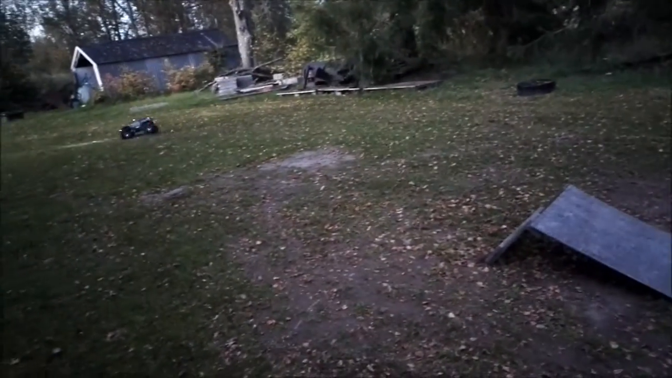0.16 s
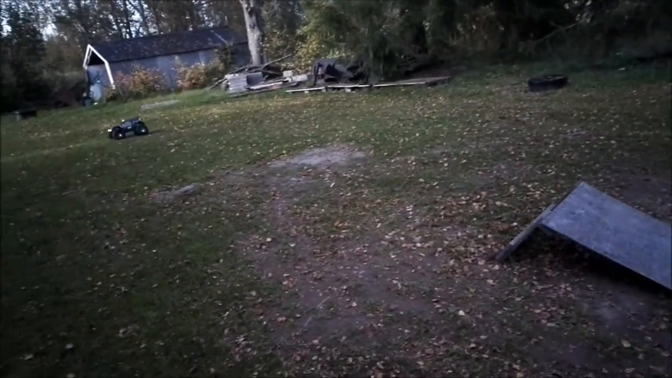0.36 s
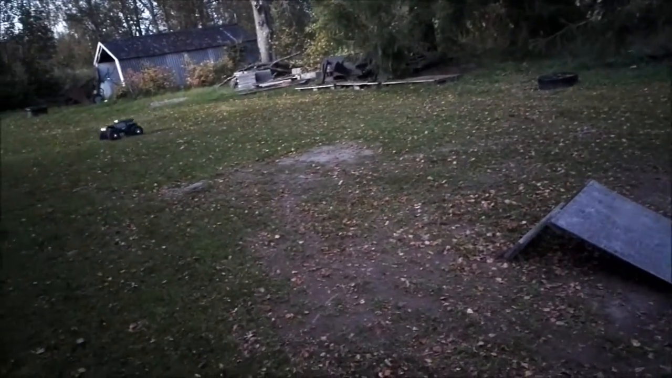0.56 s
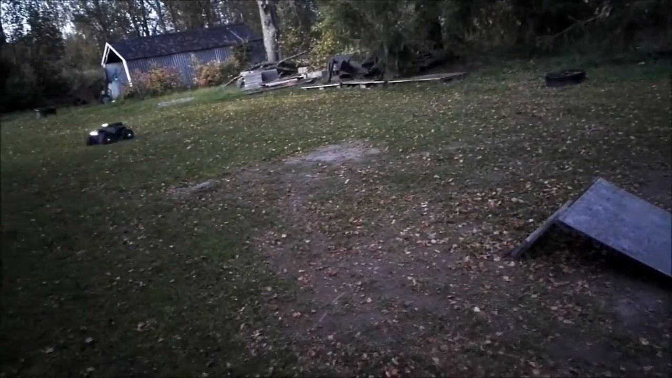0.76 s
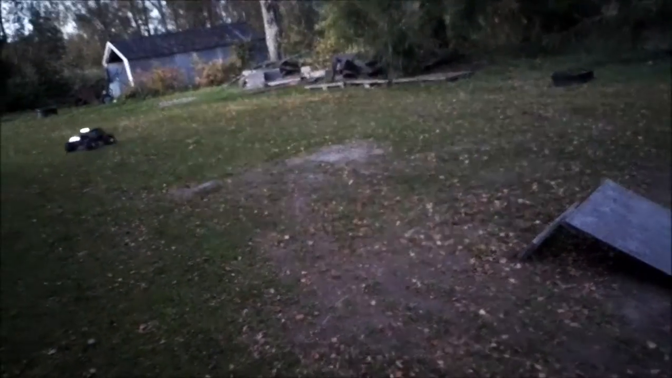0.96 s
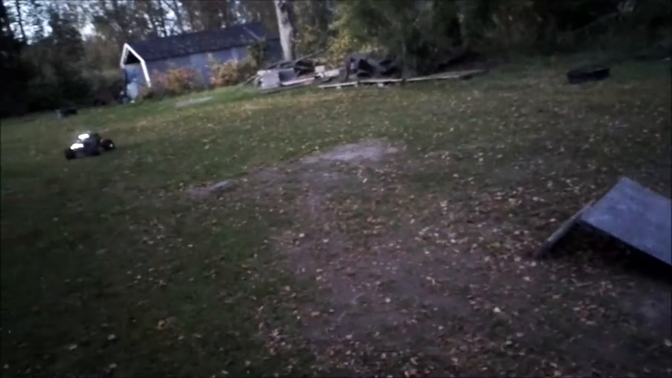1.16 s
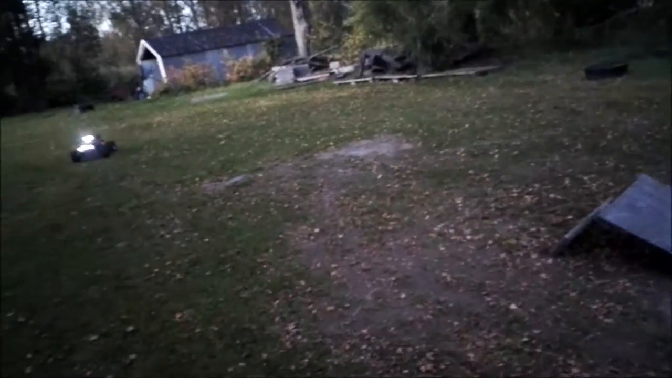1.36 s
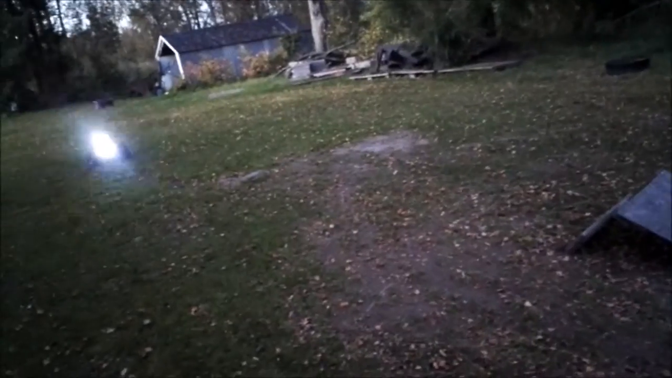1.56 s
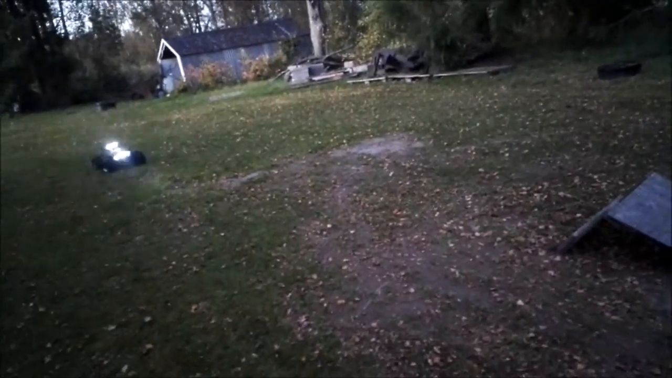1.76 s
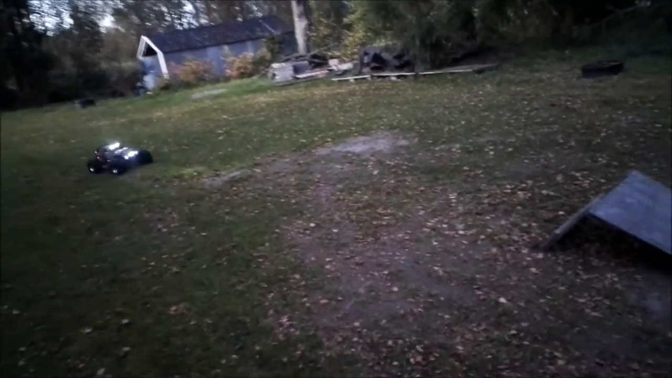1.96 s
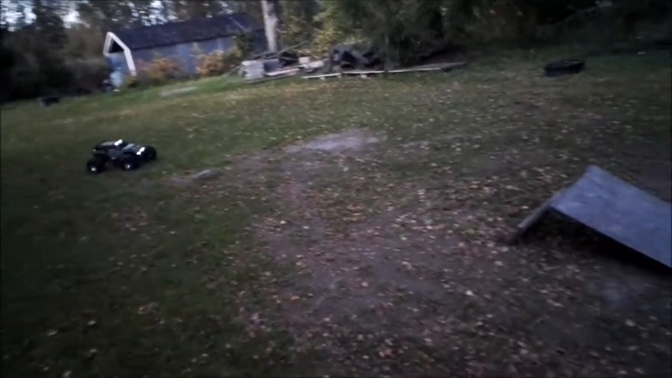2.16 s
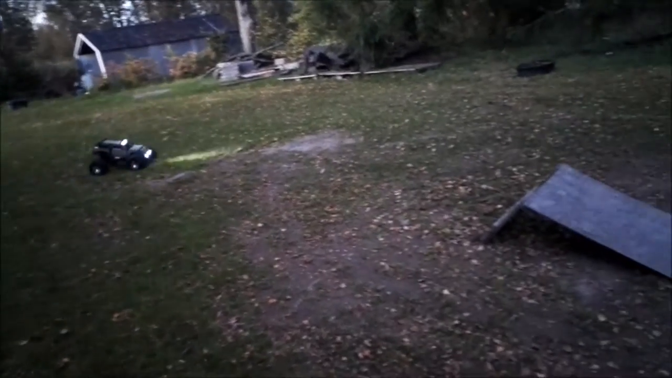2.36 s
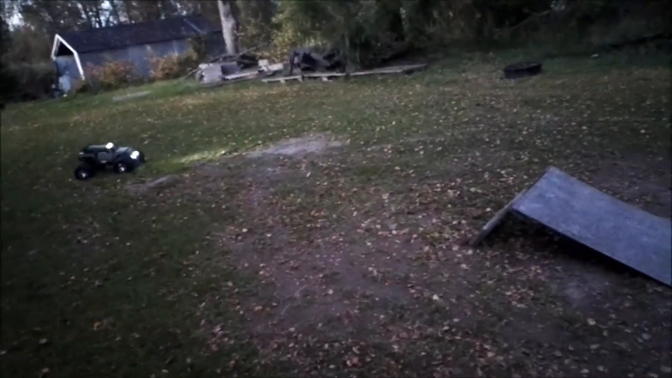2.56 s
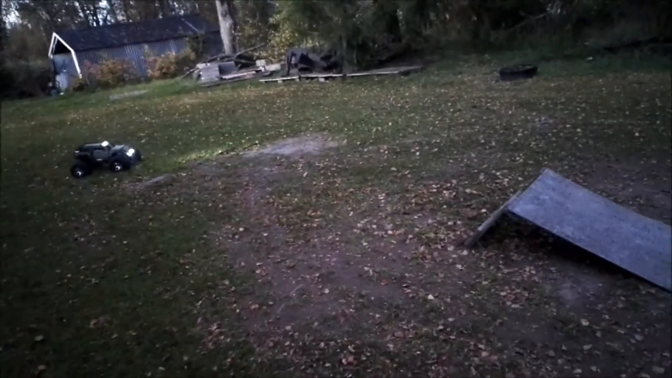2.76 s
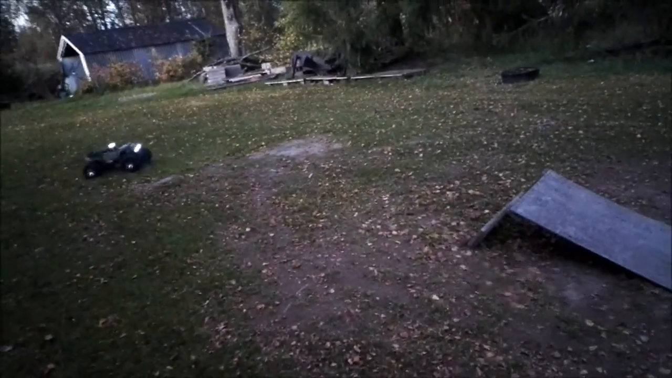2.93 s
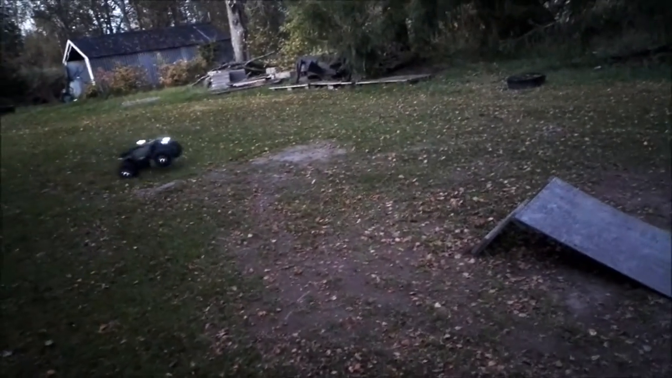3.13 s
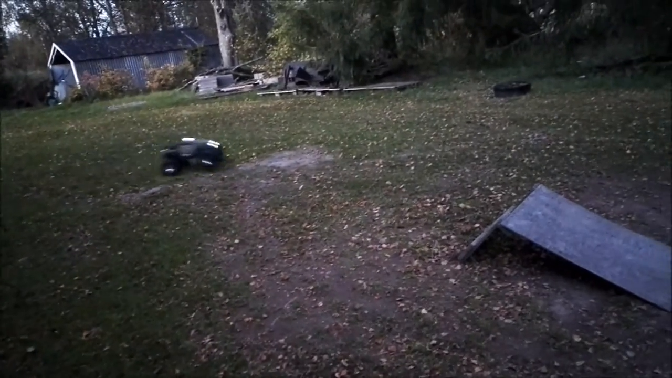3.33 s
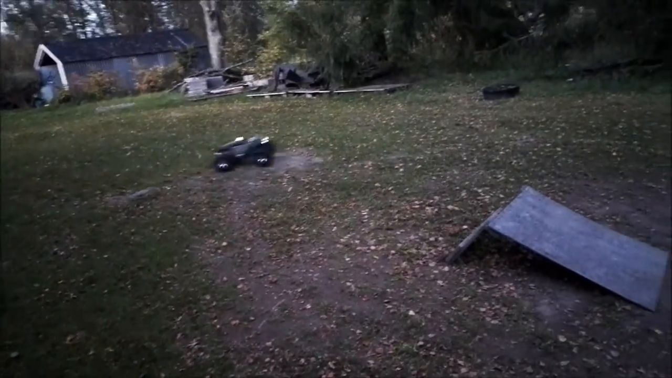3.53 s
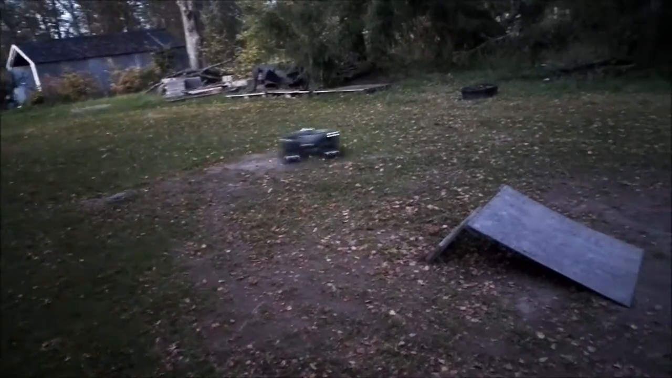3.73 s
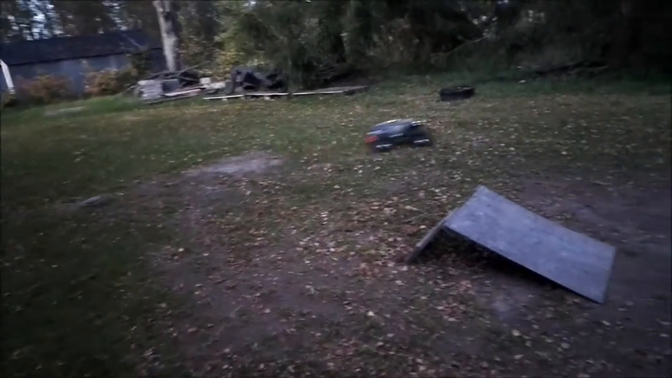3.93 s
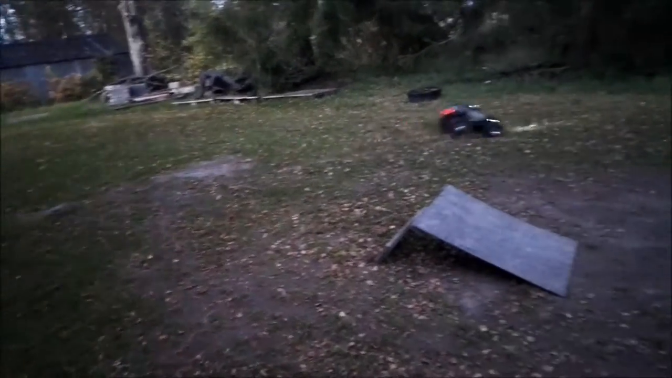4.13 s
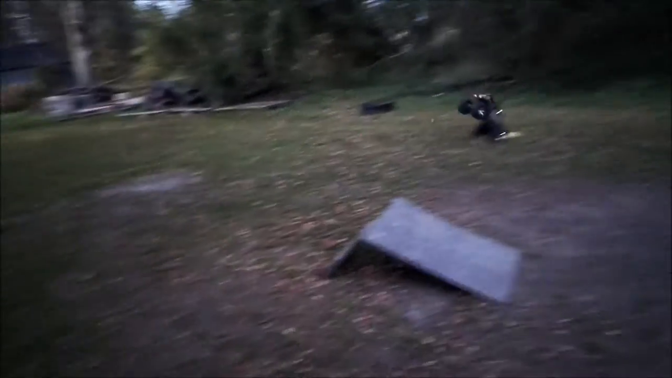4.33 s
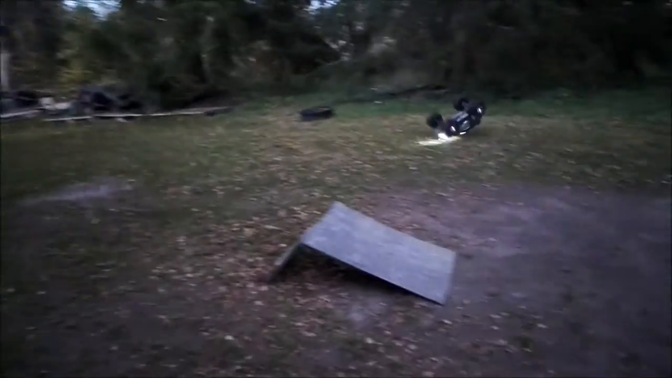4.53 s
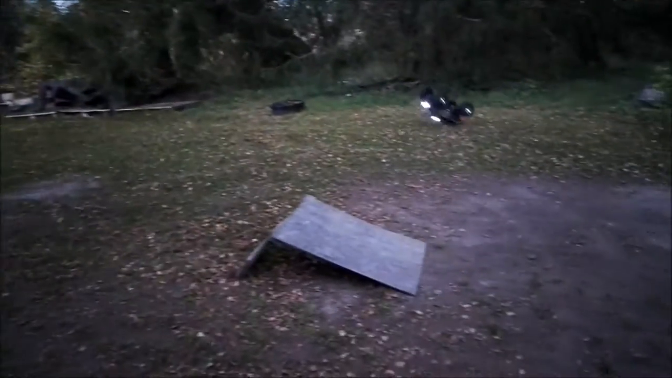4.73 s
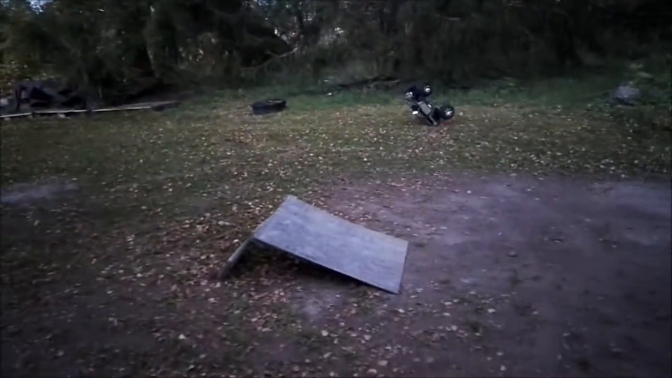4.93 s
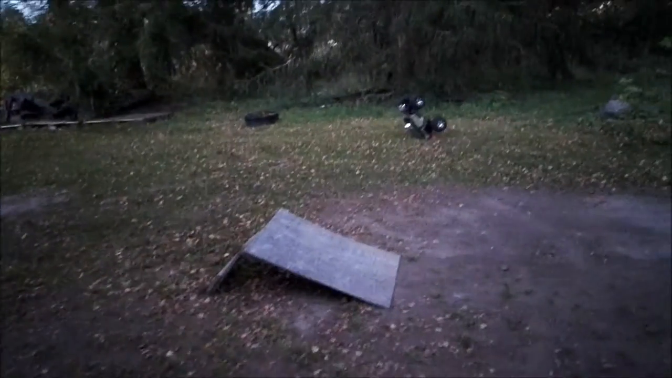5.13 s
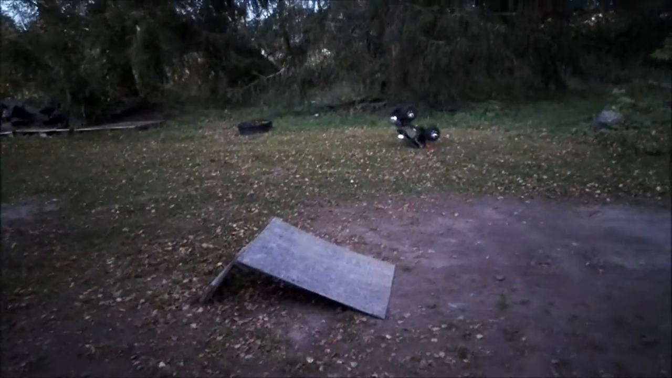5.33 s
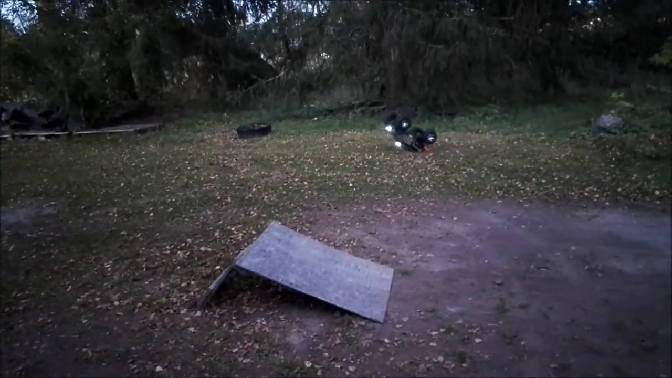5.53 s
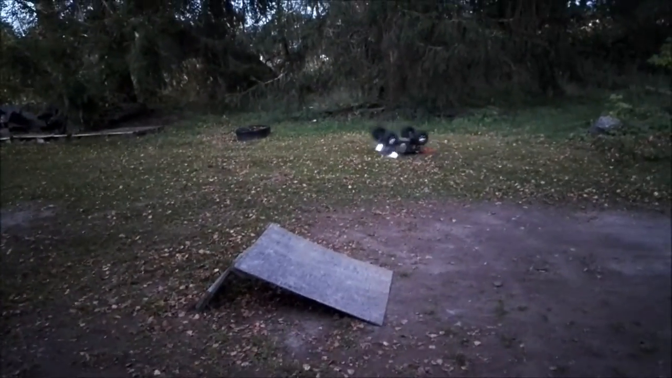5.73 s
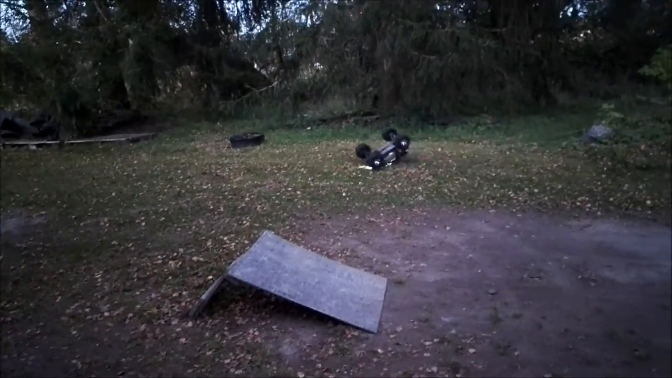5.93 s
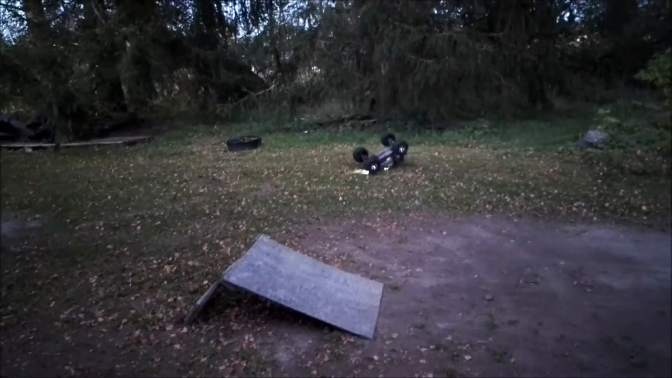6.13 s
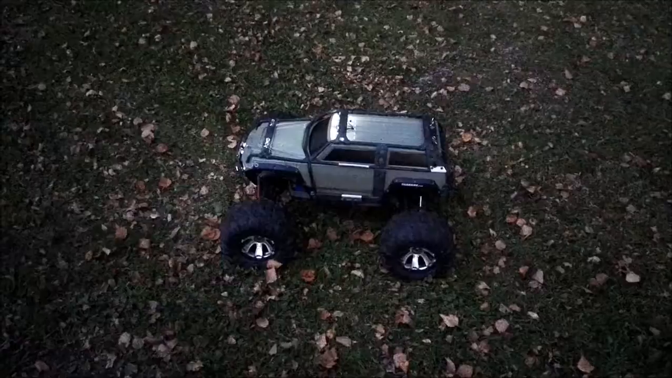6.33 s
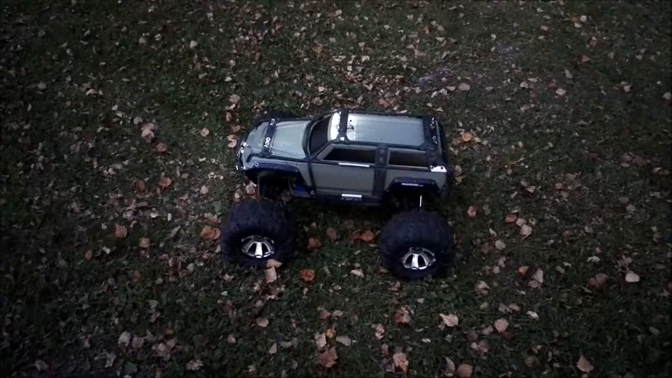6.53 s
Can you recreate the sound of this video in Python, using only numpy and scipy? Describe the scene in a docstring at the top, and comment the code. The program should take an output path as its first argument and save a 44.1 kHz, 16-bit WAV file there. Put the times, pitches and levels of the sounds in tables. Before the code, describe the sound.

Stereo outdoor microphone near the truck, with a short diffuse echo from trees. A toy electric vehicle whirs gently, climbing in pitch, clacks its gears, then races by in two harsh, high whining bursts over grass and leaves. A hard plastic crash follows, then quiet air, a lighter double knock as it topples, and tiny ticks. A brief silence gives way to thin controller whine and a servo chirp.

```python
"""Electric model truck on a leafy lawn

A small truck crawls, brakes, sprints past in two bursts, flips and topples onto its roof.
Its gears are fuzzy tones plus grinding noise; tyres, chassis and leaves are shaped noise.
Sharp noise bursts make the drive-train clacks and the blows, which also ring the hollow body.
A delayed noise wash is the echo from trees round the yard, over a bed of quiet outdoor air.
The sound breaks off, then fades in beside the standing truck, whose speed controller sings."""
import sys
import numpy as np
from scipy import signal
from scipy.fft import rfft, irfft, next_fast_len
from scipy.io import wavfile
from scipy.ndimage import uniform_filter1d, map_coordinates

SR = 44100
rng = np.random.default_rng(int(sys.argv[2]) if len(sys.argv) > 2 else 0)


def persist_wave(psi):
    """Save psi, clipped to +-1, as 16-bit WAV."""
    counts = np.round(np.clip(psi, -1, 1) * 32767).astype(np.int16)
    wavfile.write(sys.argv[1], SR, np.atleast_2d(counts).T)


N = 290613  # length [samples]

# pushes of the throttle or brake: (on [s], off [s], tooth-mesh rate it heads for [Hz], spin-up [s],
# coast [s], gear level before trim [dB], leaf rasp level before trim [dB])
THROTTLE = [(0, .05, 1183, .05, 0.52, -79, -58), (.25, .65, 1074, .02, .2, -54, -62.5),
            (.65, 1.98, 2416, 0.78, .18, -48.5, -55.5), (2.05, 2.21, 1170, 0.073, .42, -49, -54.5),
            (2.877, 3.19, 3444, .07, .19, -36.5, -41), (3.4, 3.925, 4022, .08, 0.2, -36, -43),
            (3.97, 4.12, 2306, 0.054, .36, -54.5, -48.5), (4.27, 4.33, 1923, 0.036, 0.22, -53.5, -57)]
# wheels leave the ground, the motor races and the gears shriek:
# (time [s], peak mesh rate [Hz], shriek level before trim [dB], half length [s])
HOPS = [(3.18, 4035, -47, .03), (3.433, 4120, -27, 0.011), (3.667, 4090, -28.5, 0.026),
        (3.721, 4410, -28.5, .02), (3.796, 4174, -35, .022), (3.863, 4190, -27, .022)]
# colour of the chassis rattle: (frequency [Hz], relative level [dB per Hz])
CHASSIS_COLOUR = [(60, -25.5), (250, -14.5), (430, -8.5), (600, 1), (800, -0.5), (1050, 0), (1350, -13.5),
                  (2000, -4), (4000, -44)]
# how alike left and right are, for the truck and for far sounds: (frequency [Hz], likeness [-1 to 1])
ALIKE = [(60, 0.39), (130, 0.96), (290, 0.98), (640, 0.82), (1400, -0.032), (3100, -0.16), (7000, 0.037)]
FAR_ALIKE = [(60, 0.34), (130, 1), (290, 0.5), (640, -0.058), (1400, -0.32), (3100, -0.0086)]


def amp(db):
    """Turn decibels into a plain multiplier."""
    return 10 ** (np.asarray(db) / 20)


def unit(x):
    """Scale so that the middle of the stereo image has rms 1."""
    middle = np.atleast_2d(x).mean(0)
    return x / np.sqrt(np.mean(middle ** 2) + 1e-20)


def along(points, hz):
    """Read a curve of (frequency [Hz], value) points on a log frequency axis."""
    f, v = np.transpose(points)
    return np.interp(np.log(hz + 1), np.log(f + 1), v)


def curves(rows):
    """One value per sample for each column after the time."""
    s, *columns = np.transpose(rows)
    return [np.interp(np.arange(N) / SR, s, column) for column in columns]


def wobble(rate):
    """A smooth random curve through a given number of random points a second."""
    knots = rng.standard_normal(int(N * rate / SR) + 4)
    return map_coordinates(knots, [np.arange(N) * rate / SR])


def filtered(x, response):
    """Multiply the spectrum of x by a response, which may be complex; padding stops wrap-around."""
    size = x.shape[-1]
    m = next_fast_len(size + SR // 2)
    return irfft(rfft(x, m) * response(np.fft.rfftfreq(m, 1 / SR)), m)[..., :size]


def spread(pair, alike):
    """Mix two unrelated signals into a left and right with the given likeness."""
    def mid_and_side(hz):
        angle = np.arccos(np.clip(along(alike, hz), -1, 1)) / 2
        return np.array([np.cos(angle), np.sin(angle)])

    mid, side = filtered(pair, mid_and_side)
    return np.array([mid + side, mid - side])


def rush(spectrum, alike, grain=1, patchy_db=0):
    """Stereo noise of rms 1: chopped by a grain envelope, patchy in colour, then shaped."""
    z = signal.stft(grain * rng.standard_normal((2, N)), nperseg=512)[2]
    patches = rng.standard_normal(z.shape[1:])
    patches = uniform_filter1d(patches, size=7, axis=0)  # smooth over frequency
    patches = uniform_filter1d(patches, size=8, axis=1)  # smooth over time
    patchy = z * amp(patchy_db * patches / patches.std())
    pair = signal.istft(patchy, nperseg=512)[1][:, :N]
    coloured = filtered(pair, lambda hz: amp(along(spectrum, hz)))
    return unit(spread(coloured, alike))


def bursts(times, dbs, t60s, rise):
    """An envelope that jumps at each contact and dies away, by 60 dB in each t60."""
    power, t = np.zeros(N + SR), np.arange(SR // 4) / SR
    for s, db, t60 in zip(times, dbs, t60s):
        hit = amp(db - 60 * t / t60) * (1 - np.exp(-t / rise))
        power[round(s * SR):][:len(t)] += hit ** 2
    return np.sqrt(power[:N])


def tone(turns, width, clean):
    """A stereo gear tone whose strength and phase stray the faster, the faster it turns."""
    knots = np.abs(turns * width)
    count = int(knots[-1]) + 2

    def stray():
        return np.interp(knots, np.arange(count), rng.standard_normal(count))

    sine, cosine = np.sin(2 * np.pi * turns), np.cos(2 * np.pi * turns)
    left = (clean + stray()) * sine + stray() * cosine
    right = (clean + stray()) * cosine + stray() * sine
    return unit(np.array([left, right]))


def motor():
    """Tooth-mesh rate: it climbs under throttle, sinks when coasting and leaps at each hop."""
    idle_hz = 701  # coasting sinks towards this
    hop_min_s = .022  # the motor's inertia makes no leap shorter than this
    t, hz = np.arange(N) / SR, np.full(N, THROTTLE[0][2], float)
    for on, off, top_hz, spin_up, coast, _, _ in THROTTLE:
        start_hz = hz[np.searchsorted(t, on)]
        driven = top_hz + (start_hz - top_hz) * np.exp(-np.clip(t - on, 0, off - on) / spin_up)
        coasting = np.exp(-np.maximum(t - off, 0) / coast)
        hz = np.where(t < on, hz, idle_hz + (driven - idle_hz) * coasting)
    for s, peak_hz, _, length in HOPS:
        leap = np.exp(-((t - s) / max(length, hop_min_s)) ** 4)
        hz = hz + (peak_hz - hz) * leap
    return hz


def effort(mesh_hz):
    """Gains of gear noise and leaf rasp: attack, hold and release for each push, louder with speed."""
    attack_s, release_db = 0.0107, 28  # the load builds up; it loses this much in one coast time
    gear_db_per_octave, rasp_db_per_octave = 1.5, 2  # faster is louder
    t, gear, rasp = np.arange(N) / SR, 0, 0
    for on, off, top_hz, _, coast, gear_db, rasp_db in THROTTLE:
        attack = np.clip((t - on) / attack_s, 0, 1)
        load = attack * amp(-release_db * np.maximum(t - off, 0) / coast)
        octaves = np.log2(np.interp(np.minimum(t, off), t, mesh_hz) / top_hz)
        gear = np.maximum(gear, load * amp(gear_db + gear_db_per_octave * octaves))
        rasp = np.maximum(rasp, load * amp(rasp_db + rasp_db_per_octave * octaves))
    return gear, rasp


def gears(mesh_hz, gain):
    """Each gear stage gives a fuzzy tone that swells at gearbox resonances; the teeth grind."""
    # gearbox resonances: (frequency [Hz], level [dB])
    housing = [(500, -16.5), (850, -9.5), (1080, -4.5), (1350, -5), (1750, -2.5), (2150, 1), (2550, -1),
               (3000, 1.5), (3600, 2.5), (4200, 1.5), (5200, 3.5), (12000, -28)]
    # gear-train tones: (multiple of mesh rate, relative level [dB], width [share of pitch])
    orders = [(.6, -20.5, .1), (.79, 0, .02), (1, -3, .012), (1, 0, .14), (1.999, -10, .015),
              (2.002, -5.5, .1), (3, -15.5, 0.027)]
    # colour of the tooth noise: (frequency [Hz], relative level [dB per Hz])
    grind_colour = [(700, -23.5), (1300, -12.5), (1900, -12), (2500, 2), (3100, 2), (3700, 3), (4150, -2),
                    (4600, -6.5), (5500, -7), (8000, -16)]
    teeth_per_turn, tight_s = 194.2, 1.08  # teeth met in a wheel turn; one passing of the tight spot [s]
    tight_sharp, tight_sag = 2.7, .045  # narrowness of the tight spot; share of speed lost there
    tight_db, ring_hz, ring_db = 5, 3750, -3.5  # swell at the tight spot, and the gearbox ring there
    t = np.arange(N) / SR

    # at moderate speed the gears bind once in each wheel turn: they slow, grow louder and ring
    wheel = np.cumsum(mesh_hz) / SR / teeth_per_turn
    binding = np.interp(mesh_hz, [1300, 1650, 2300, 3000], [0, 1, 1, 0])
    angle = 2 * np.pi * (wheel - np.interp(tight_s, t, wheel))
    tight = binding * np.exp(tight_sharp * (np.cos(angle) - 1))
    # bumps in the turf jerk the speed
    jerk = np.interp(mesh_hz, [1100, 1800, 3000, 3900], [.008, .03, .025, .01])
    turns = np.cumsum(mesh_hz * (1 + jerk * wobble(60) - tight_sag * tight)) / SR

    whine = 0
    for k, db, width in orders:
        # narrow tones change level with speed; all come and go as the wheels grip and slip
        speed_db = np.interp(mesh_hz, [1100, 1700, 3500], [1, -3, -7]) * (width < .05)
        level_db = along(housing, k * mesh_hz) + db + speed_db + 4 * wobble(22)
        whine = whine + amp(level_db) * tone(k * turns, width, clean=0.22)
    grind = rush(grind_colour, ALIKE, amp(1.6 * wobble(500)), patchy_db=3.5)

    # at high speed the teeth grind harder and the first and second overtones shriek
    strain = np.clip((mesh_hz - 3300) / 600, 0, 1)
    mix = amp(-5) * unit(whine) + (amp(-3.5) + .2 * strain) * grind
    ring = amp(ring_db) * tight * tone(ring_hz * t, width=.035, clean=0.58)
    mix = amp(tight_db * tight) * mix + ring
    shriek = tone(2 * turns, width=.03, clean=.8)
    shriek = shriek + amp(-5) * tone(2 * turns, width=.12, clean=0)
    shriek = shriek + amp(-12) * tone(3 * turns, width=.09, clean=0)
    racing = sum(amp(db) * np.exp(-((t - s) / length) ** 2) for s, _, db, length in HOPS)
    shriek_gain = strain * (amp(-4.5) * gain + amp(-6.5) * racing)
    return amp(-3.0) * gain * mix + shriek_gain * shriek


def squeals(mesh_hz):
    """Gears squeal when a wheel snatches: short wavering tones that glide with the motor speed."""
    # (time [s], pitch [Hz], level before trim [dB], half length [s])
    snatches = [(0.434, 1056, -52.5, 0.081), (0.594, 1080, -48, 0.042), (1.08, 3520, -43, 0.018),
                (1.7, 2133, -52, 0.033), (2.252, 2260, -54, 0.035), (2.34, 1280, -56, 0.03),
                (2.388, 1006, -53, 0.024), (3.052, 3028, -37, 0.027), (3.227, 2396, -44, 0.035),
                (3.714, 2400, -39.5, 0.016), (4.068, 3052, -39, 0.021), (4.07, 3620, -40.5, 0.015),
                (4.072, 1860, -40.5, 0.0091), (4.145, 1009, -47.5, 0.014), (4.148, 1957, -43, 0.011),
                (4.333, 1585, -51.5, 0.021)]
    # the clean part of the tone depends on pitch: (frequency [Hz], clean tone over rough part)
    cleanness = [(1000, 1.6), (2000, 1.8), (3000, .5)]
    out, t = np.zeros((2, N)), np.arange(-SR // 8, SR // 8) / SR
    for s, hz, db, length in snatches:
        start = round(s * SR) - SR // 8
        speed = mesh_hz[start:][:len(t)] / mesh_hz[round(s * SR)]
        voice = tone(np.cumsum(hz * speed) / SR, width=.06, clean=along(cleanness, hz))
        out[:, start:][:, :len(t)] += amp(db) * np.exp(-(t / length) ** 2) * voice
    return out


def rolling(tearing):
    """Tyres drum, the chassis rattles, leaves and grass rasp, most when driven tyres tear at them."""
    # bumpiness of the ride: (time [s], tyre drumming before trim [dB], chassis rattle before trim [dB])
    ground_crawl = [(0.0, -52.5, -56.5), (0.33, -63, -59.5), (1.38, -61.5, -57), (1.97, -51, -55),
                    (2.25, -57, -53), (2.65, -85, -67), (2.74, -77, -66), (2.82, -79, -70)]
    ground_sprint = [(2.85, -54, -57.5), (2.916, -41.5, -47.5), (3.164, -38, -44), (3.344, -58, -56),
                     (3.368, -47.5, -57), (3.482, -41, -40), (3.74, -39, -40.5), (3.792, -45, -43),
                     (4.164, -42.5, -52.5), (4.264, -47.5, -58.5), (4.32, -60.5, -54), (4.56, -60, -75.5)]
    # colours of hollow tyres, and of leaves and grass: (frequency [Hz], relative level [dB per Hz])
    drum_colour = [(30, -32), (55, -22), (90, -5), (150, 4), (260, 3.5), (360, -1.5), (480, -17),
                   (700, -20), (1500, -72.5)]
    rasp_colour = [(700, -17), (1400, -1.5), (2400, 3.5), (3500, -7), (4600, 1.5), (5600, 4), (7000, 4.5),
                   (8500, 6.5), (10500, 5.5), (13000, 2), (15000, -13.5)]
    flip_s, stop_db_per_s = 4.6, 22.5  # once the truck has flipped, the rolling dies away
    dying_db = stop_db_per_s * np.maximum(np.arange(N) / SR - flip_s, 0)
    drum_db, rattle_db = np.array(curves(np.vstack([ground_crawl, ground_sprint]))) - dying_db

    drum = amp(drum_db - 0.5 + 1.4 * wobble(35)) * rush(drum_colour, ALIKE, patchy_db=1.5)
    rattle_noise = rush(CHASSIS_COLOUR, ALIKE, amp(1.0 * wobble(180)), patchy_db=2.5)
    rattle = amp(rattle_db + 2.0) * rattle_noise
    leaves = np.hypot(tearing, amp(drum_db - 10))  # freely rolling tyres stir leaves too
    crackle = amp(0.76 * wobble(900) + 1.3 * wobble(70))
    rasp = amp(4.0) * leaves * rush(rasp_colour, ALIKE, crackle, patchy_db=2.0)
    return drum + rattle + rasp


def clacks():
    """Slack in the drive train snaps tight: short bright bursts, each with a knock of the chassis."""
    # (time [s], snap level before trim [dB], knock against snap before trim [dB], left minus right [dB])
    snaps = [(1.684, -28.5, -18, 1), (2.0526, -16.5, -37, 3), (2.064, -24.5, -15, 10),
             (2.0748, -24.5, -20, 10), (2.093, -28, -27, 4), (2.105, -29, -22, 10), (2.1134, -32, -32, 5),
             (2.724, -38, -8, 8), (2.834, -48.5, -3, 4), (2.857, -25, -19, 7), (2.875, -25.5, -22, -1),
             (2.8971, -29, -20, -4), (3.3729, -23.5, -14, 5), (4.129, -38.5, -2.5, 1)]
    # (frequency [Hz], relative level [dB per Hz])
    snap_colour = [(500, -34), (1500, -9), (3000, -1), (4300, 7), (5500, 12), (7000, -5.5), (9500, 6.5),
                   (12000, -2), (15000, 2)]
    s, db, knock_db, pan_db = np.transpose(snaps)
    left, right = [bursts(s, db + side * pan_db / 2, np.full(len(s), .014), rise=.0006)
                   for side in (1, -1)]
    snap = np.array([left, right]) * rush(snap_colour, ALIKE)
    knock = bursts(s, db + knock_db, np.full(len(s), .06), rise=0.00063) * rush(CHASSIS_COLOUR, ALIKE)
    return amp(0.5) * snap + amp(2) * knock


def shell(hz):
    """The causal response of the plastic body: a sum of resonances with alternating sign."""
    # (centre [Hz], width [Hz], level [dB])
    resonances = [(241, 37, -3), (370, 42, -6), (478, 90, -7), (575, 57, 2), (721, 160, -5), (904, 110, -9),
                  (1553, 39, -9)]
    response = 0
    for k, (centre, width, db) in enumerate(resonances):
        damping = 1j * hz * width
        response = response + (-1) ** k * amp(db) * damping / (centre ** 2 - hz ** 2 + damping)
    return response


def tumble():
    """Each blow cracks the plastic, sets the hollow body booming and thumps the turf."""
    # the body hits the ground: (time [s], crack level [dB], body boom level before trim [dB],
    # ground thump level [dB], brightness [0 to 1], crack t60 [s])
    blows = [(4.6, -31, -25, -24.5, 0.3, 0.05), (4.606, -27.5, -28, -46, 0.55, 0.14),
             (4.617, -20, -22, -21, 0, 0.039), (4.623, -32, -33, -32, 1, 0.058),
             (4.641, -10, -28, -36, 0.36, 0.034), (4.645, -14, -17.5, -48, 0.4, 0.041),
             (4.915, -40, -38.5, -58, 0.4, 0.038), (4.944, -51, -48.5, -59, 0.1, .09),
             (5.808, -40, -39, -60, 0, 0.086), (5.826, -21.5, -25, -68, 0.53, 0.029),
             (5.832, -31.5, -28.5, -54, 0.1, 0.034), (5.842, -22, -28.5, -51, 0.57, 0.017),
             (5.852, -56, -35, -43, 0.04, 0.059), (6.181, -44.5, -51.5, -67, 0.08, 0.028),
             (6.211, -55.5, -45, -61, 0.25, 0.039), (6.223, -47.5, -55, -66, 0, 0.04)]
    # colours of crack, hard plastic edges and turf: (frequency [Hz], relative level [dB per Hz])
    crack_colour = [(300, -11), (1000, -1.5), (1900, -2), (2400, 3.5), (3000, 5), (3800, 2), (5000, 4.5),
                    (8000, -5), (11000, 0.5), (15000, -19)]
    edge_colour = [(500, -20.5), (2500, -8.5), (4500, -2), (7000, 10), (10000, 7), (13500, 1.5),
                   (15000, -6)]
    thump_colour = [(30, -20.5), (80, -0.5), (130, -4), (220, 7), (400, -7), (900, -34.5)]
    s, crack_db, boom_db, thump_db, bright, t60 = np.transpose(blows)
    bright = np.clip(bright, .01, .99)

    # brightness shares the power of a blow between crack and edge
    crack = bursts(s, crack_db + 10 * np.log10(1 - bright), t60, rise=0.0013)
    crack = crack * rush(crack_colour, ALIKE, amp(0.67 * wobble(1200)))
    edge = bursts(s, crack_db + 10 * np.log10(bright), t60, rise=0.00079) * rush(edge_colour, ALIKE)
    thump = bursts(s, thump_db, 2 * t60, rise=0.0071) * rush(thump_colour, ALIKE)

    # a single push and a crunch of noise both ring the body
    push = np.zeros(N)
    push[np.round(s * SR).astype(int)] = amp(boom_db + 38)
    crunch = bursts(s, boom_db + 19.0, t60, rise=0.00074) * spread(rng.standard_normal((2, N)), ALIKE)
    return crack + edge + thump + filtered(push + crunch, shell)


def electronics():
    """The speed controller sings at multiples of its switching rate; the steering servo chirps."""
    # (multiple of the switching rate, relative level [dB])
    switching = [(1, -9.5), (2, -8.5), (4, -1), (6, 4), (7, -2), (8, -1)]
    # (time [s], controller level [dB])
    sing_levels = [(0, -66), (.65, -86), (1, -86.5), (6.3, -87.5), (6.38, -67), (6.59, -63.5)]
    # (time [s], pitch [Hz], level [dB])
    servo_chirps = [(2.63, 11800, -54), (6.496, 12350, -38.5), (6.574, 12900, -46.5)]
    switch_hz = 1705
    t = np.arange(N) / SR
    sing_db, = curves(sing_levels)
    out = 0
    for k, db in switching:
        out = out + amp(sing_db + db + 3.6 * wobble(14)) * np.sin(2 * np.pi * k * switch_hz * t)
    for s, hz, db in servo_chirps:
        pulse = amp(db) * np.exp(-((t - s) / 0.0036) ** 2)
        out = out + pulse * np.sin(2 * np.pi * hz * t + 0.99 * wobble(900))
    return out


def yard(x):
    """Trees and sheds scatter the sound's energy back as a diffuse wash after a short delay."""
    # (frequency [Hz], t60 [s])
    decay_times = [(150, 0.33), (600, 0.6), (2000, 0.71), (6000, 0.71), (13000, 0.4)]
    # the echo carries little bass: (frequency [Hz], level [dB])
    echo_colour = [(40, -28), (90, -5.5), (200, -2), (600, 0), (2000, 1), (15000, -0.5)]
    hz, _, z = signal.stft(x, SR, nperseg=384)
    power = (np.abs(z) ** 2).mean(0)
    power = np.abs(uniform_filter1d(power, size=3, axis=0))
    t = np.arange(SR // 192) * 192 / SR
    near = 1 + 2 * np.exp(-t / 0.11)  # the nearest things answer most strongly
    onset = np.clip((t - .012) / 0.0099, 0, 1)
    decay = (near * onset * amp(-60 * t / along(decay_times, hz)[:, None])) ** 2
    decay = decay / decay.sum(1, keepdims=True)
    wash = np.abs(signal.fftconvolve(power, decay, axes=1))[:, :z.shape[2]]
    # noise takes on the strength of the wash at each time and frequency
    noise = signal.stft(rng.standard_normal((2, N)), nperseg=384)[2]
    pair = signal.istft(np.sqrt(wash) * noise / noise.std(), nperseg=384)[1][:, :N]
    return filtered(spread(pair, FAR_ALIKE), lambda f: amp(along(echo_colour, f)))


def air():
    """Quiet outdoor air: steady, slightly patchy noise, a little stronger on the right."""
    # (frequency [Hz], relative level [dB per Hz])
    air_colour = [(25, -7.5), (60, -8), (105, -9), (165, -4), (250, -4), (400, -11.5), (700, -7),
                  (1000, -7.5), (1400, -12), (1950, -12), (2800, -23.5), (5500, -25), (12000, -22.5),
                  (15000, -22)]
    return amp(-57.5) * rush(air_colour, FAR_ALIKE, patchy_db=1.5) * amp([[-.8], [.8]])


def scene():
    """The truck with its echo, in quiet outdoor air."""
    # treble balance of the two sides: (frequency [Hz], left minus right [dB])
    side_balance = [(400, 0.5), (1200, 0), (2400, -1), (4400, -3.5), (8200, -7.5), (10000, -2), (12500, 8),
                    (15000, 8)]
    mesh_hz = motor()
    gear, tearing = effort(mesh_hz)
    drive = gears(mesh_hz, gear) + squeals(mesh_hz) + rolling(tearing)
    snaps, crash = clacks(), tumble()
    echo = yard(amp(-11.5) * drive + amp(-10.0) * snaps + amp(-8.0) * crash)
    truck = amp(-1.26) * drive + snaps + crash + echo

    def left_and_right(hz):
        tilt_db = along(side_balance, hz) / 2
        return amp(np.array([tilt_db, -tilt_db]))

    return filtered(truck, left_and_right) + air() + electronics()


def record(dry):
    """The sound breaks off and fades back in; high peaks are rounded and the top treble is cut."""
    # (time [s], gain)
    gate_points = [(0, 1), (6.231, 1), (6.236, 0), (6.372, 0), (6.48, .2), (6.59, .7)]
    headroom, top_hz = .95, 14450  # rounding ceiling [full scale]; middle of the treble cut [Hz]
    gate, = curves(gate_points)
    rounded = dry / (1 + np.abs(dry / headroom) ** 6) ** (1 / 6)
    return filtered(rounded * gate, lambda hz: np.clip((top_hz - hz) / 400 + .5, 0, 1))


dry = scene()
out = record(dry)
persist_wave(out)
```